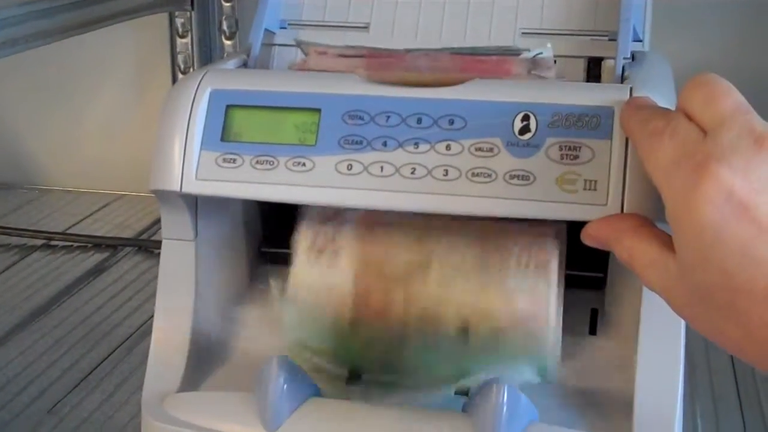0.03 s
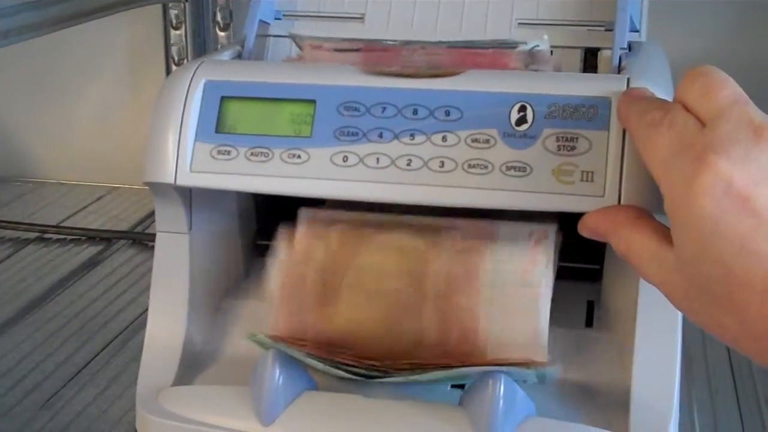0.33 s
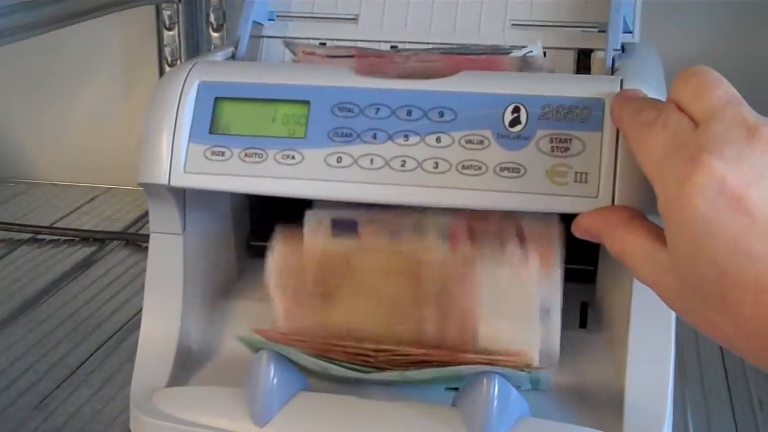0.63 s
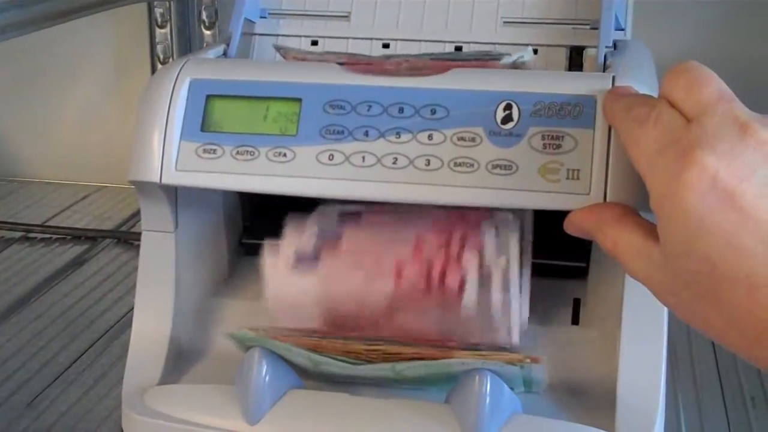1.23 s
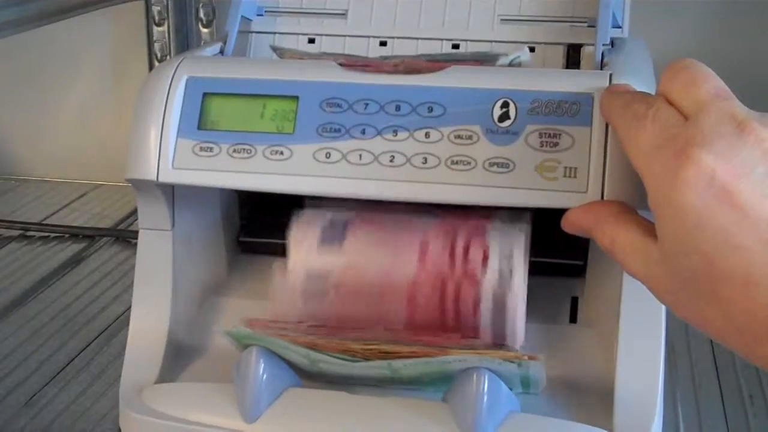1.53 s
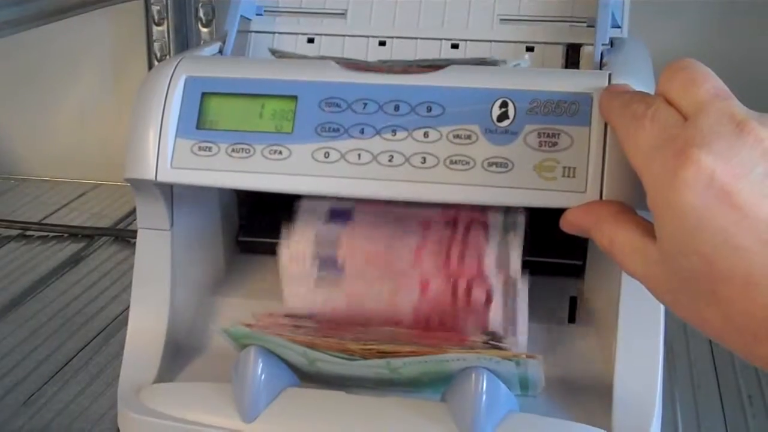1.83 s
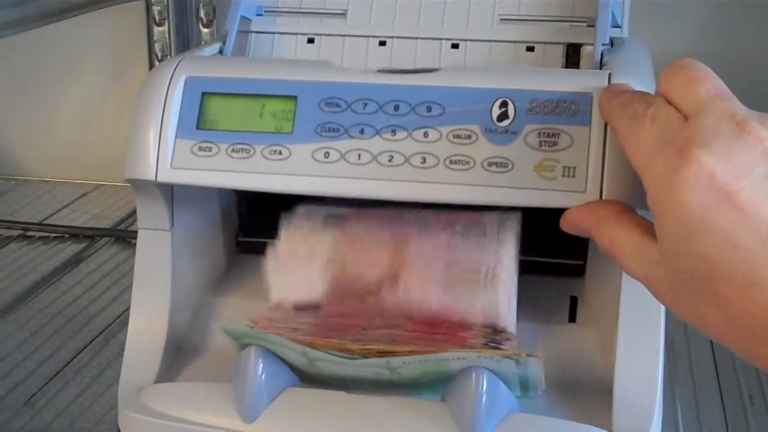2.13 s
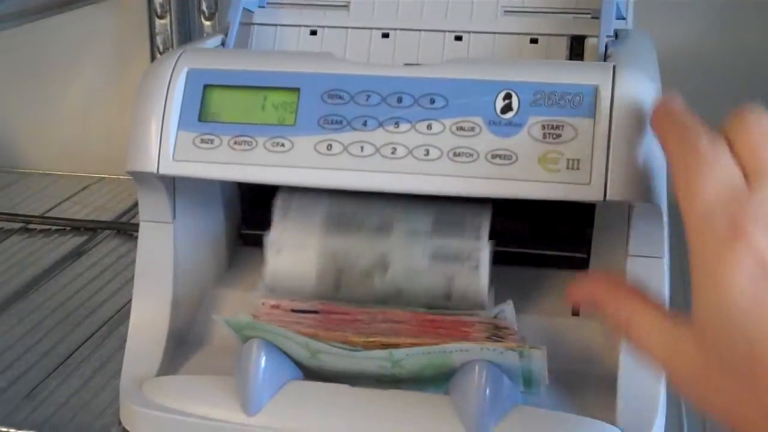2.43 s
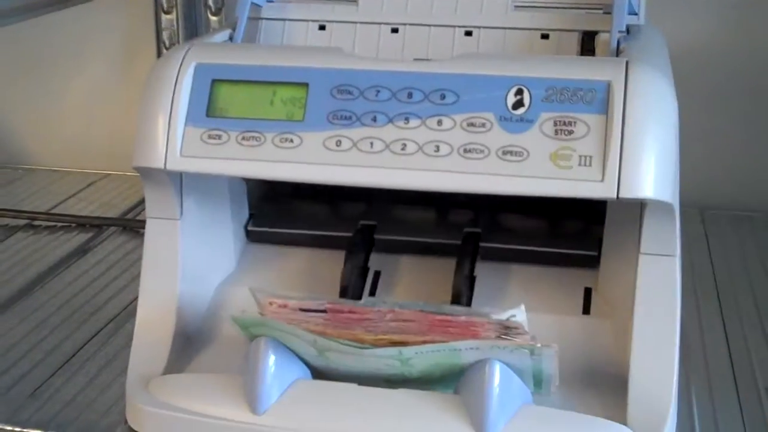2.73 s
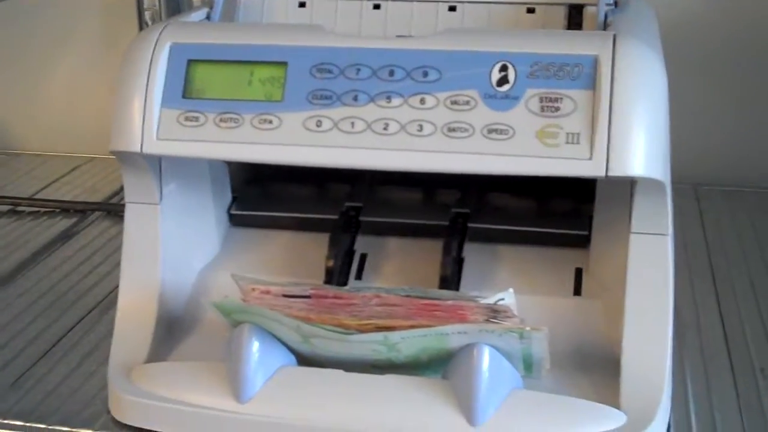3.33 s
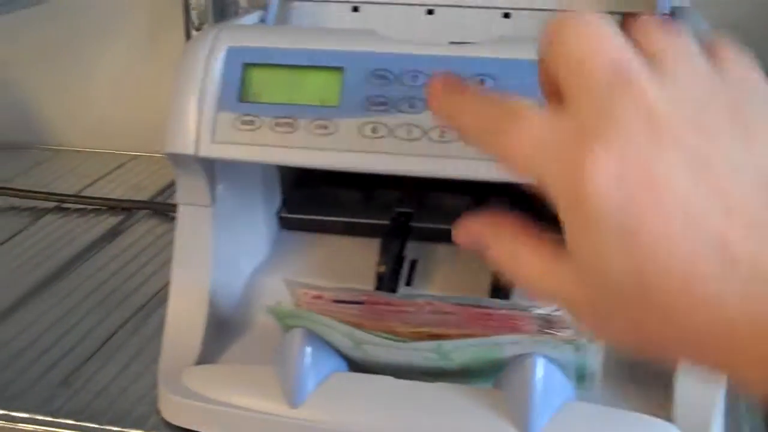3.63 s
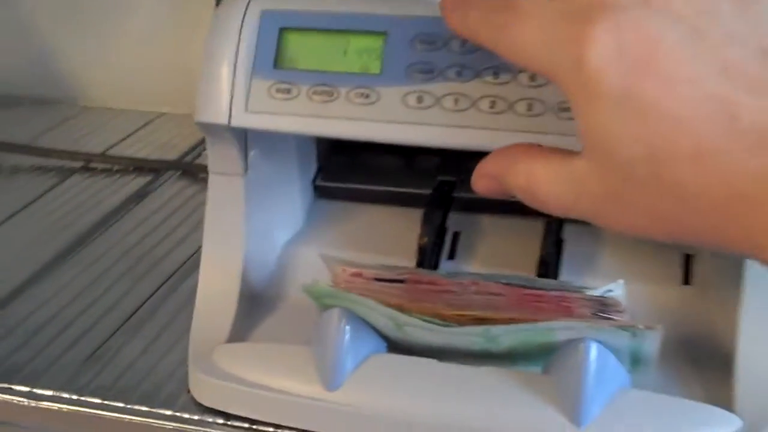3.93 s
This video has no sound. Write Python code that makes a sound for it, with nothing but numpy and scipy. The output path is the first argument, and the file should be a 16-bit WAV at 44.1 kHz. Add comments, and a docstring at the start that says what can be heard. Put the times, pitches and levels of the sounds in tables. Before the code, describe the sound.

Paper notes riffle fast through a whirring banknote counter, which then slows to a stop.

```python
"""A banknote counter on a shelf in a quiet room, the microphone close. Over the whirr of its gears it pulls
about 24 notes a second: each scrapes in, slaps the stack and flicks its tail, while the drive knocks
twice a turn in the plastic housing. Near 2.5 s the hopper is empty; the drive idles, then brakes in
ever slower knocks. The stacker wheels coast to rest, ticking on their guides, the stack settles,
and a low handling rumble swells at the microphone."""
import sys
import numpy as np
from scipy import signal
from scipy.fft import rfft, irfft, next_fast_len
from scipy.io import wavfile
from scipy.ndimage import map_coordinates

SR = 44100
rng = np.random.default_rng(int(sys.argv[2]) if len(sys.argv) > 2 else 0)


def bounce(signal):
    """Save signal as a 16-bit WAV file at the path given by the first command-line argument."""
    frames = np.transpose(np.atleast_2d(signal))
    limited = np.clip(frames, -1, 1)
    pcm = np.round(limited * 32767).astype(np.int16)
    wavfile.write(sys.argv[1], SR, pcm)


N = 176400
T = np.arange(N) / SR
NOTES_PER_S, FIRST_NOTE_S, EMPTY_S = 23.58, .0205, 2.468  # the feed is already running at 0 s
IDLE_FROM_S, IDLE_KNOCKS_PER_S, MOTOR_FADE_S = 2.4765, 50.4, 2.8

# Spectrum of the quiet room: frequency_hz, gain_db
AIR_COLOUR = [(25, 1.5), (90, -12), (250, -3), (520, -5.5), (1000, -4.5), (1800, -4.5), (2500, -8),
              (3100, -11.5), (4500, -14.5), (7000, -21), (14000, -26)]
# Faint steady tones in the room: pitch_hz, level_db
ROOM_TONES = [(512, -79), (592, -86.5), (765, -78.5), (1004, -78)]
# Spectrum of the belts and gears: frequency_hz, gain_db
WHIRR_COLOUR = [(60, -52.5), (130, -45), (220, -15.5), (340, -4), (430, 0.5), (560, -10.5), (720, -7),
                (1020, 0.5), (1500, -10), (1900, -9), (2700, -11), (3300, -20.5), (5000, -17),
                (7000, -18.5), (11000, -23.5), (14000, -33)]
# Tones of the running motor: pitch_hz, level_db
MOTOR_TONES = [(235, -74), (324, -63), (349, -66), (426, -59.5), (715, -58.5)]
# Resonances of a stacker wheel: pitch_hz, width_hz, gain_db
WHEEL_MODES = [(739, 28, -2.5), (1082, 76, 4), (1313, 77, -5.5), (1800, 70, -17.5), (2713, 70, -7.5)]
# Wheel rattle, steady until the first row, then dying away: time_s, level_db
WHEEL_LEVELS = [(2.9, -57), (3.0, -65), (3.1, -66), (3.2, -67), (3.32, -75), (3.42, -86), (3.55, -100)]
# One note scrapes in, lands, slides and flicks its tail: delay_s, attack_s, decay_s, hiss_db, rattle_db
NOTE_CONTACTS = [(.0042, .0036, .009, 2, -5), (.011, .005, .008, -3.5, 0), (.024, .007, .003, -2.5, -6),
                 (.0285, .003, .0022, 2.5, -.5)]
# Rise and fall of the paper noise during the feed: time_s, hiss_gain_db, rattle_gain_db
FEED_GAINS = [(0, -29.5, -28.5), (.12, -31, -28.5), (.33, -30.5, -27.5), (.62, -35.5, -29.5),
              (.76, -33.5, -29.5), (.9, -37, -32.5), (1.2, -34, -30.5), (1.38, -37, -32), (1.56, -33, -29),
              (1.72, -36.5, -31.5), (1.95, -34, -31), (2.2, -36.5, -31.5), (2.45, -35.5, -31.5)]
# Spectrum of scraping paper: frequency_hz, gain_db
HISS_COLOUR = [(300, -80.5), (1400, -30), (2400, -11), (3100, -5), (4100, -3.5), (5300, -1), (6400, 1),
               (8000, -4), (11000, -7.5), (14000, -16)]
# Spectrum of paper in the stacker pocket: frequency_hz, gain_db
RATTLE_COLOUR = [(60, -43), (130, -35), (230, -17), (330, -8.5), (450, -9), (560, -14), (690, 2), (850, 1),
                 (1060, 3), (1300, -4.5), (1430, -5), (1530, 2.5), (1820, 1), (2100, -3.5), (2600, -5.5),
                 (3430, -16), (3505, -5.5), (3590, -16), (6000, -38)]
# Spectrum of the pocket under a slap: frequency_hz, gain_db
SLAP_COLOUR = [(60, -67), (150, -37), (300, -14.5), (550, -12.5), (720, 10), (950, -5.5), (1400, -13.5),
               (1720, 5), (3000, -13.5), (7000, -14.5), (14000, -47)]
# Notes that slap the stack hard: start_s, strength_db
HARD_LANDINGS = [(.020, -20), (.105, -16), (.148, -18), (.237, -22), (.276, -20), (.301, -20), (.323, -17),
                 (.367, -21), (.408, -14), (.429, -19), (.580, -18), (.664, -15.5), (.795, -18),
                 (1.087, -19), (1.218, -19), (1.261, -21.5), (1.303, -17), (1.555, -18), (1.594, -18),
                 (1.643, -17.5), (1.768, -14), (1.809, -14.5), (1.853, -19), (1.891, -21), (1.936, -19.5),
                 (2.025, -19.5), (2.064, -19), (2.275, -20.5), (2.374, -19), (2.463, -19)]
# Resonances of the plastic housing: pitch_hz, width_hz, gain_db
HOUSING_MODES = [(345, 40, -12), (434, 60, -17.5), (720, 55, -8.5), (996, 81, 2.5), (1060, 110, 4.5),
                 (1220, 90, -3), (1285, 39, 6), (1500, 41, -6.5), (1828, 96, -1.5), (2010, 61, -11),
                 (2650, 80, -4.5), (4070, 90, -11.5)]
# Crisp notes that snap: start_s, strength_db
CRISP_NOTES = [(.086, -15), (.106, -15), (.172, -16), (.232, -16), (.3165, -12.5), (.469, -17), (.513, -18),
               (.767, -16.5), (1.5495, -14), (1.658, -18), (1.805, -19), (1.998, -19), (2.185, -19),
               (2.270, -19), (2.3735, -17)]
# Drive knocks under the brake: time_s, strength_db, judder_hz
BRAKE_KNOCKS = [(2.754, -27.5, 1140), (2.775, -28.5, 1160), (2.798, -28.5, 1170), (2.824, -28, 1170),
                (2.855, -27.5, 1170), (2.894, -28.5, 1170), (2.948, -30.5, 1170)]
# Coasting wheels touch their guides: time_s, peak_db
GUIDE_CONTACTS = [(2.977, -42), (3.004, -48), (3.028, -49), (3.083, -53), (3.143, -48), (3.188, -51),
                  (3.202, -52), (3.23, -53), (3.246, -54), (3.275, -55), (3.302, -52), (3.323, -56),
                  (3.357, -59)]
# Ticks of the settling stack: start_s, peak_db
SETTLING_TICKS = [(3.028, -50.5), (3.045, -47.5)]
# Spectrum of a settling tick: frequency_hz, gain_db
SETTLING_COLOUR = [(500, -12), (3000, 6), (5000, -21), (6200, 5), (9000, -8), (13000, -8)]
# Spectrum of handling noise at the microphone: frequency_hz, gain_db
HANDLING_COLOUR = [(3, 18), (12, -11), (30, -18.5), (70, -22), (200, -33.5), (500, -52), (2000, -87.5)]
# Swell of the handling noise: time_s, level_db
HANDLING_LEVELS = [(2.7, -76), (3.1, -62), (3.5, -51), (3.8, -61), (4, -70)]
# Time the room takes to fall by 60 dB: frequency_hz, decay_s
ROOM_DECAY = [(200, 0.18), (1200, 0.54), (4000, 0.07), (12000, 0.16)]


def amp(db):
    """Decibels to amplitude."""
    return 10 ** (np.asarray(db) / 20)


def unit(x):
    """x scaled to rms 1."""
    return x / np.sqrt(np.mean(x ** 2) + 1e-20)


def along(points, hz):
    """Interpolate (frequency_hz, value) points on a log axis."""
    f, v = np.transpose(points)
    return np.interp(np.log(hz + 1), np.log(f + 1), v)


def wobble(rate):
    """A smooth random curve, rate knots a second."""
    return map_coordinates(rng.standard_normal(int(N * rate / SR) + 4), [T * rate])


def filtered(x, response):
    """x times a complex response of frequency."""
    size = next_fast_len(N + SR // 2)
    return irfft(rfft(x, size) * response(np.fft.rfftfreq(size, 1 / SR)), size)[:N]


def coloured(x, points):
    """x through a causal filter shaped by (frequency_hz, gain_db) points."""
    def response(hz):
        cepstrum = irfft(np.log(amp(along(points, hz))))
        half = len(cepstrum) // 2
        cepstrum[1:half] *= 2
        cepstrum[half + 1:] = 0
        return np.exp(rfft(cepstrum))
    return filtered(x, response)


def plastic(x, modes, soft_hz=2300):
    """x through the resonances of a plastic part, dulled above soft_hz."""
    def response(f):
        body = sum(amp(db) * 1j * f * width / (hz * hz - f * f + 1j * f * width)
                   for hz, width, db in modes)
        return body / (1 + 1j * np.sqrt(2) * f / soft_hz - (f / soft_hz) ** 2)
    return filtered(x, response)


def grains(rate, spread_db):
    """Tiny random impacts of uneven size, rms 1."""
    impacts = (rng.random(N) < rate / SR) * rng.choice([-1, 1], N)
    return unit(impacts * amp(spread_db * np.clip(rng.standard_normal(N), -2, 2)))


def tones(rows, waver_rad):
    """Slightly unsteady sines, one per (pitch_hz, level_db) row."""
    return sum(amp(db) * np.sqrt(2) * np.sin(2 * np.pi * hz * T + waver_rad * wobble(18))
               for hz, db in rows)


def contact_power(times, dbs, attack_s, decay_s):
    """Power envelope of contacts that swell to their times and die away."""
    power = np.zeros(N)
    for s, db in zip(times, dbs):
        near = slice(max(0, int(s * SR) - SR // 20), int(s * SR) + SR // 10)
        age = T[near] - s
        power[near] += amp(2 * db) * np.exp(-2 * np.where(age < 0, (age / attack_s) ** 2, age / decay_s))
    return power


def strike(out, start_s, peak_db, force, ring):
    """Add to out the ring of a body driven by a short force."""
    hit = signal.fftconvolve(force, ring[:len(force)])[:len(force)]
    out[max(0, round(start_s * SR)):][:len(hit)] += amp(peak_db) * hit / np.abs(hit).max()


def paper_hits(rows, colour, decay_s, rough):
    """Single pushes with a brief crumple, one per (start_s, peak_db) row."""
    out, t = np.zeros(N), T[:SR // 20]
    ring = coloured(np.ones(1), colour)
    for s, db in rows:
        crumple = unit(rng.standard_normal(len(t)) * t * np.exp(-2 * t / decay_s))
        push = rough * crumple / np.sqrt(len(t))
        push[0] += 1
        strike(out, s, db, push, ring)
    return out


def room_tone():
    """The quiet room: soft air and a faint hum."""
    air = unit(coloured(rng.standard_normal(N), AIR_COLOUR))
    return amp(-67) * air + tones(ROOM_TONES, waver_rad=.44)


def motor(fade_db_per_s=80):
    """Belts and gears whirr over the motor's tones; all fade once the brake is on."""
    whirr = unit(coloured(grains(rate=6000, spread_db=4), WHIRR_COLOUR))
    whirr *= amp(-48 + 1.2 * wobble(100))  # the level flutters
    fade = amp(-fade_db_per_s * np.maximum(T - MOTOR_FADE_S, 0))
    return (whirr + tones(MOTOR_TONES, waver_rad=1.19)) * fade


def stacker_wheels():
    """The plastic wheels turn with a faint ringing rattle that dies as they coast to rest."""
    rattle = unit(plastic(grains(rate=600, spread_db=3.5), WHEEL_MODES))
    return rattle * amp(np.interp(T, *np.transpose(WHEEL_LEVELS)))


def paper_feed(scatter_s=.0012, scatter_db=.9):
    """Each note scrapes in, slides and flicks its tail: a hiss above, a rattle in the pocket below."""
    starts = np.arange(FIRST_NOTE_S - 1 / NOTES_PER_S, EMPTY_S, 1 / NOTES_PER_S)
    hiss_power, rattle_power = amp(-7.5) ** 2, amp(-7) ** 2  # steady bed between contacts
    for delay, attack, decay, hiss_db, rattle_db in NOTE_CONTACTS:
        late, shared, own = rng.standard_normal((len(starts), 3)).T  # no two notes are alike
        times = starts + delay + scatter_s * late
        hiss_power += contact_power(times, hiss_db + scatter_db * shared, attack, decay)
        rattle_power += contact_power(times, rattle_db + scatter_db * (shared + own) / 2, attack, decay)
    feeding = np.exp(-np.maximum(T - EMPTY_S, 0) / .0013)
    feed_s, hiss_gain_db, rattle_gain_db = np.transpose(FEED_GAINS)

    def friction(grit, colour, power, level_db):
        pulses = feeding * np.sqrt(power / power[T < EMPTY_S].mean())
        level = amp(np.interp(T, feed_s, level_db))
        return coloured(grit * pulses * level, colour) / coloured(grit, colour).std()

    hiss = friction(grains(rate=15000, spread_db=6.5), HISS_COLOUR, hiss_power, hiss_gain_db - 1.65)
    rattle = friction(grains(rate=4000, spread_db=2.5), RATTLE_COLOUR, rattle_power, rattle_gain_db - 1.03)
    return hiss + rattle


def slaps(rows, puff_hz=856, width_s=.0015):
    """A note landing flat makes a puff of two or three cycles and rings the pocket."""
    out = amp(-1.5) * paper_hits(rows, SLAP_COLOUR, decay_s=.0022, rough=1.4)
    for s, db in rows:
        near = slice(max(0, int(s * SR) - SR // 100), int(s * SR) + SR // 100)
        age = T[near] - s - width_s / 2
        hz = puff_hz * rng.uniform(.87, 1.19)
        out[near] += amp(db) * np.exp(-(age / width_s) ** 2) * np.sin(2 * np.pi * hz * age)
    return out


def landings():
    """Every note slaps the stack lightly; some land hard."""
    light = [(s + rng.normal(.008, .0028), rng.normal(-31, 1.3))
             for s in np.arange(FIRST_NOTE_S, EMPTY_S, 1 / NOTES_PER_S)]
    return slaps(light) + amp(-4.5) * slaps(HARD_LANDINGS)


def knocks(rows, rise_s=.005, fall_s=.0028, grit_db=-10):
    """Each knock is a judder of the drive: a short swell of quick, uneven slips that ring the housing."""
    out, t = np.zeros(N), T[:SR // 10]
    lead_s = 2 * rise_s
    swell = np.exp(-np.where(t < lead_s, ((t - lead_s) / rise_s) ** 2, (t - lead_s) / fall_s))
    ring = plastic(np.ones(1), HOUSING_MODES)
    for s, db, hz in rows:
        slip_cycles = np.abs(np.arange(32) + .15 * rng.standard_normal(32))
        slip_s = slip_cycles / (hz * rng.normal(1, .065))
        slips = unit(np.bincount((slip_s * SR).astype(int), minlength=len(t)))
        force = slips / 2 + amp(grit_db) * rng.standard_normal(len(t))
        strike(out, rng.normal(s, .0005) - lead_s, db, force * swell, ring)
    return out


def drive(loaded_db=-33.5, idle_db=-30, judder_hz=1100, low_cut_hz=250):
    """Two knocks a turn, faster and louder without paper, slowing under the brake."""
    loaded_s = np.arange(FIRST_NOTE_S + .0061, EMPTY_S, 1 / NOTES_PER_S / 2)
    idle_s = np.arange(IDLE_FROM_S, BRAKE_KNOCKS[0][0] - .5 / IDLE_KNOCKS_PER_S, 1 / IDLE_KNOCKS_PER_S)
    loaded = [(s, loaded_db, judder_hz) for s in loaded_s]
    idle = [(s, idle_db, judder_hz) for s in idle_s]
    return filtered(knocks(loaded + idle + BRAKE_KNOCKS), lambda hz: hz ** 4 / (hz ** 4 + low_cut_hz ** 4))


def snaps():
    """Crisp notes snap with a bright crumple."""
    return amp(-6.5) * paper_hits(CRISP_NOTES, HISS_COLOUR, decay_s=.0059, rough=9)


def wheel_ticks(half_contact_s=.0013):
    """The coasting wheels brush their guides and ring in uneven ticks."""
    out, t = np.zeros(N), T[:SR // 20]
    ring = plastic(np.ones(1), WHEEL_MODES)
    for s, db in GUIDE_CONTACTS:
        rub = rng.standard_normal(len(t)) * np.exp(-(t / half_contact_s - 1) ** 2)
        strike(out, s - 2 * half_contact_s, db, rub, ring)
    return out


def stack_settling():
    """The stack settles with two small paper ticks."""
    return paper_hits(SETTLING_TICKS, SETTLING_COLOUR, decay_s=.005, rough=3.3)


def handling():
    """A low rumble swells as the microphone shifts."""
    rumble = unit(coloured(rng.standard_normal(N), HANDLING_COLOUR))
    return rumble * amp(np.interp(T, *np.transpose(HANDLING_LEVELS)))


def reflections(x, tail_db=-12, walls_db=-14):
    """The near walls of the shelf answer within 8 ms, then the room adds a short tail."""
    hz, t, noise = signal.stft(rng.standard_normal(SR // 2), SR, nperseg=256)
    decay = amp(-60 * t / along(ROOM_DECAY, hz)[:, None])
    tail = signal.istft(noise * decay, SR, nperseg=256)[1]
    answer = amp(tail_db) * tail / np.linalg.norm(tail)
    wall_delays = (SR * rng.uniform(.001, .008, size=8)).astype(int)
    answer[wall_delays] += amp(walls_db) * rng.choice([-1, 1], size=8) / np.sqrt(8)
    return signal.fftconvolve(x, answer)[:N]


def scene():
    """The machine on its shelf in a quiet room, close up, in mono."""
    machine = motor() + stacker_wheels() + paper_feed() + landings() + drive() + snaps()
    machine += wheel_ticks() + stack_settling()
    return (room_tone() + machine + reflections(machine) + handling())[None]


def record(dry, top_hz=14050):
    """The microphone passes nothing above top_hz."""
    return filtered(dry[0], lambda hz: hz < top_hz)[None]


dry = scene()
out = record(dry)
bounce(out)
```